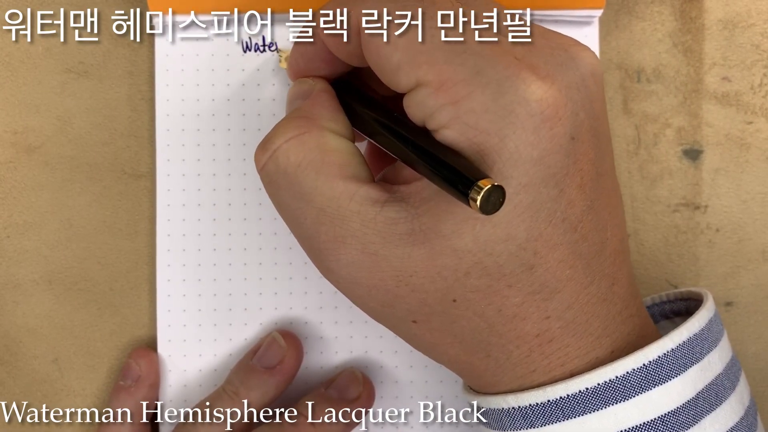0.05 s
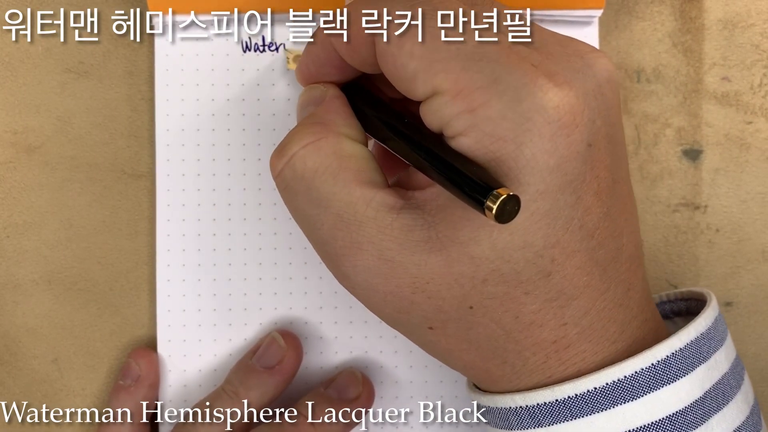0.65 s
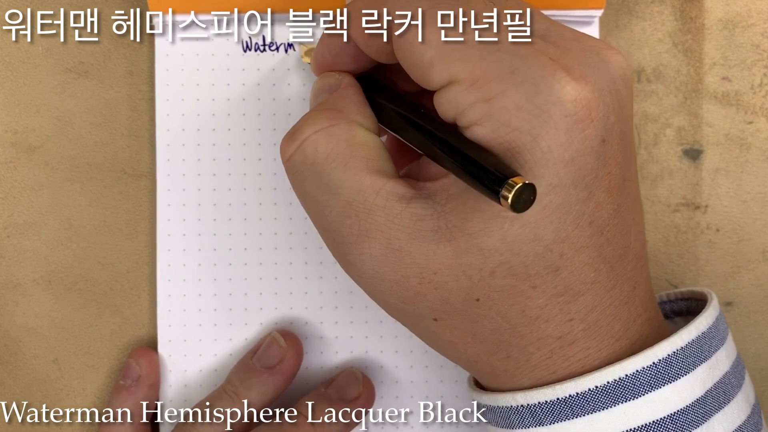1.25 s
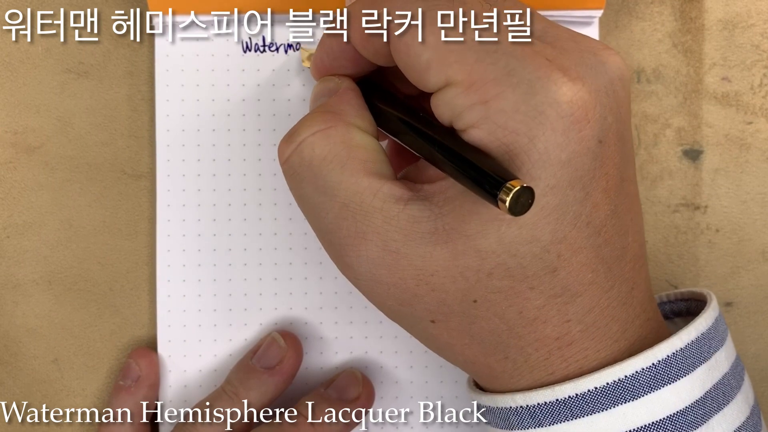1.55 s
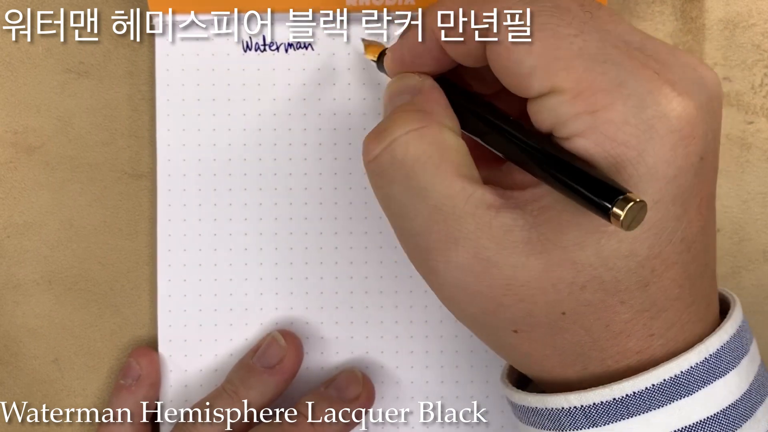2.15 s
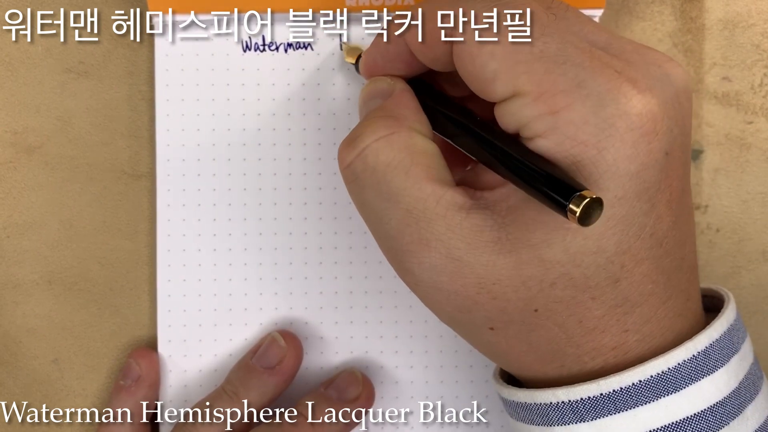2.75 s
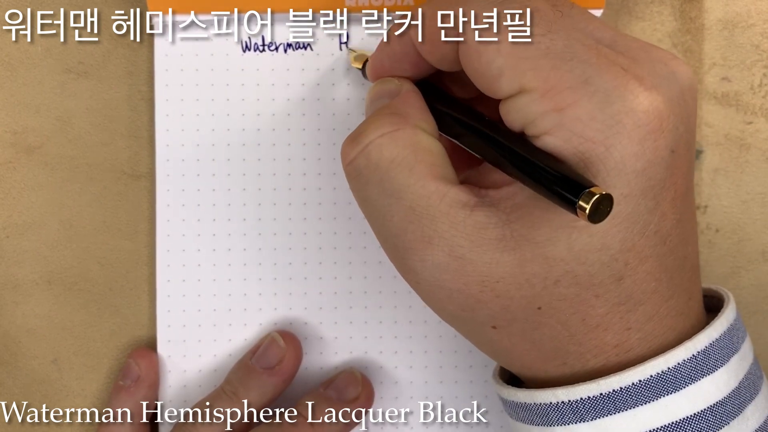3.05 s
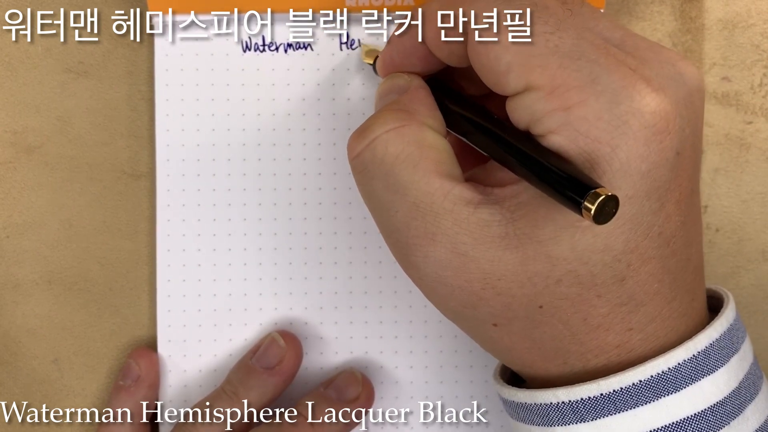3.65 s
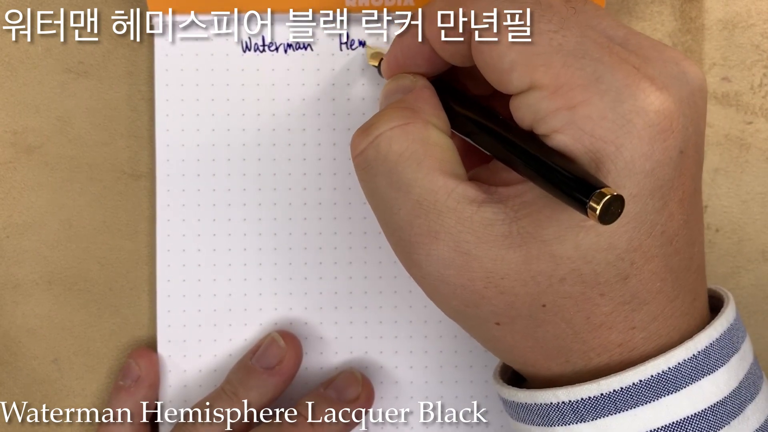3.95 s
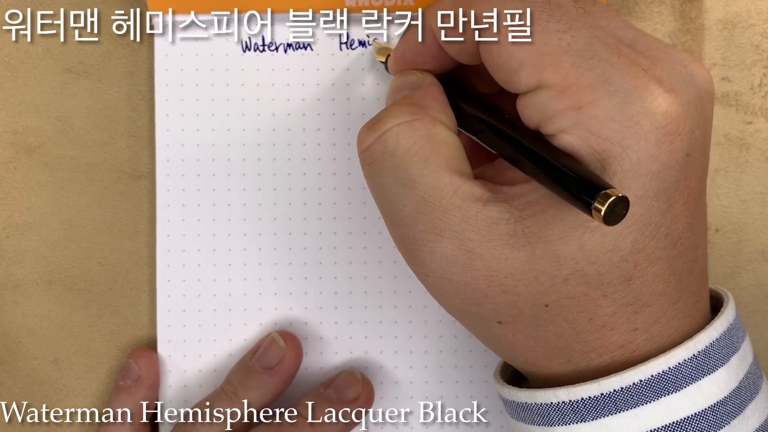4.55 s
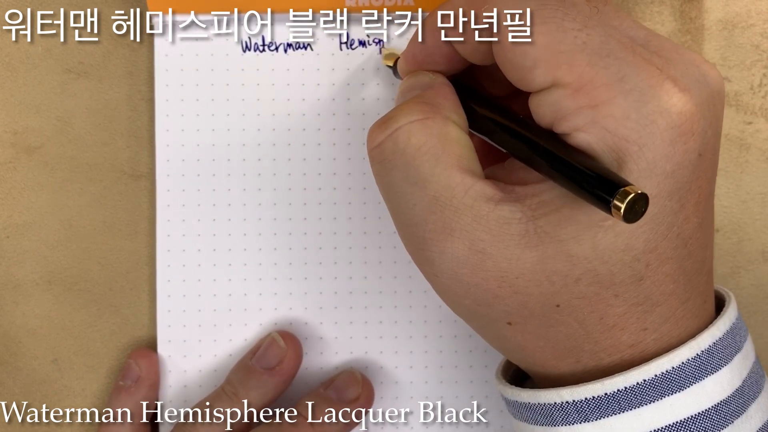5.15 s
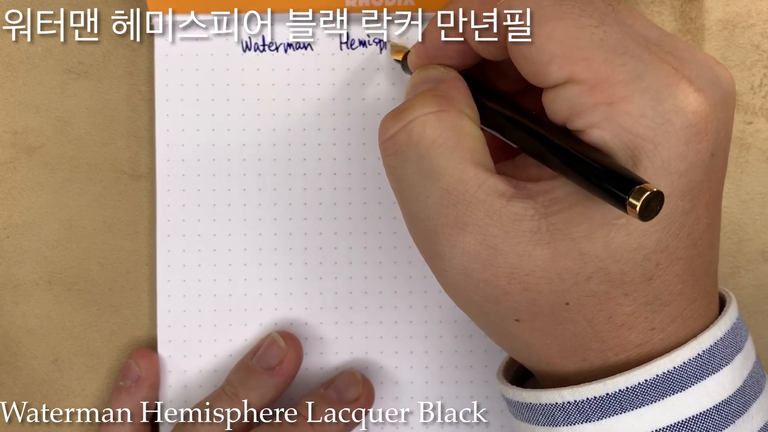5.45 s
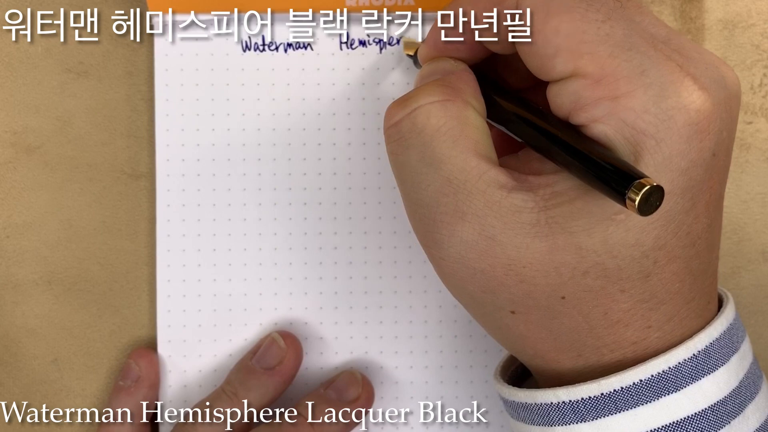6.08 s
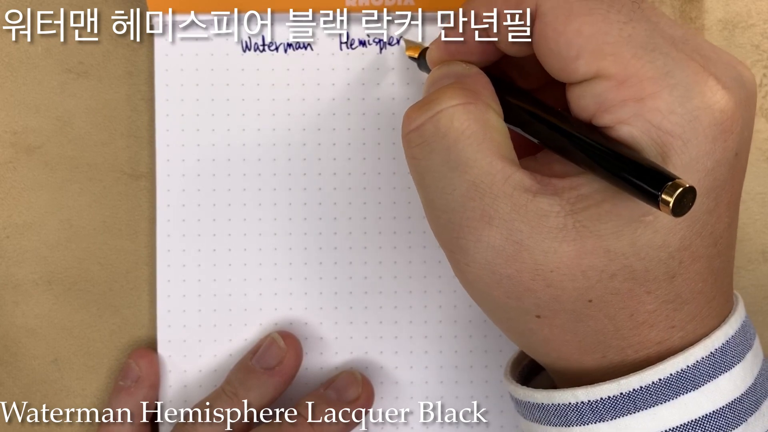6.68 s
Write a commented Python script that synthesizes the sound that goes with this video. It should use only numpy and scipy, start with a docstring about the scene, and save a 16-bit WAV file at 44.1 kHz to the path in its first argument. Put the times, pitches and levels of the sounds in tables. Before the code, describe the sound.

In a quiet room with a low, slowly throbbing hum, a hand brushes softly over paper and a fountain pen starts scratching out small letters. The close microphone picks up the nib's thin rasp, sharp little clicks and soft knocks through the pad into the desk. The hand shifts with a gritty swish between words, then a longer run of strokes follows, ending with a rough catch of the nib and a faint brush of skin.

```python
"""First you hear a quiet room's low hum, a hand brushing over paper and the scratch of a fountain pen.
Two motors and the mains make the hum. The pen writes small letters on a pad on a wooden desk:
its steel tip, the nib, rasps over the paper fibres and chatters when pushed against them.
The nib also clicks, taps down so that the desk thumps, and now and then snags.
Between the words the hand slides along the page, once breaking free with a gritty jerk."""
import sys
import numpy as np
from scipy import signal
from scipy.fft import rfft, irfft
from scipy.io import wavfile

SR = 44100
rng = np.random.default_rng(int(sys.argv[2]) if len(sys.argv) > 2 else 0)


def unload_audio(sound):
    """Save the sound as a 16-bit wav file, at the path given as the first command line argument."""
    columns = np.transpose(np.atleast_2d(sound))
    # keep every value between -1 and 1, then stretch to whole-number steps
    steps = np.round(np.clip(columns, -1, 1) * 32767)
    wavfile.write(sys.argv[1], SR, steps.astype(np.int16))


N = 300762
TIME = np.arange(N) / SR


def from_db(db):
    """Turn decibels into a number to multiply a sound by."""
    return 10 ** (np.asarray(db) / 20)


def rms_one(x):
    """Scale a signal so that its average strength (rms) is one."""
    return x / np.sqrt(np.mean(x ** 2) + 1e-20)


def drift(rate):
    """A smooth random wobble of strength one that changes about `rate` times a second."""
    hz = np.arange(N // 2 + 1) * SR / N
    return rms_one(irfft(rfft(rng.standard_normal(N)) / (1 + (hz / rate) ** 2), N))


def colour(x, spectrum):
    """Shape a sound's lows and highs along a curve of (f/Hz, level/dB); strength one."""
    points_hz, points_db = np.transpose(spectrum)
    hz = np.arange(1, N // 2 + 2) * SR / N
    curve_db = np.interp(np.log(hz), np.log(points_hz), points_db)
    return rms_one(irfft(rfft(x) * from_db(curve_db), N))


def resonate(x, modes):
    """Ring an object's natural tones (modes), added with alternating signs; narrow ones ring longer."""
    out = np.zeros(len(x))
    for k, (hz, width, db) in enumerate(modes):
        r = np.exp(-np.pi * width / SR)
        poles = [1, -2 * r * np.cos(2 * np.pi * hz / SR), r * r]
        out += (-1) ** k * from_db(db) * (1 - r * r) / 2 * signal.lfilter([1, 0, -1], poles, x + 1e-18)
    return out


def shifting_ring(fibres, modes, wander_db):
    """Each tone grows and fades as the turning pen presses differently on the paper; strength one."""
    return rms_one(sum((-1) ** k * resonate(fibres, [mode]) * from_db(wander_db * drift(2.8))
                       for k, mode in enumerate(modes)))


def strike(times, peak_db, modes, contact_hz):
    """Knocks on an object, each ringing up to its given peak; a soft contact lacks the highs."""
    soften = signal.butter(2, min(contact_hz, .45 * SR), fs=SR, output="sos")
    blows = np.zeros(N)
    blows[np.round(np.asarray(times) * SR).astype(int)] = from_db(peak_db)
    one_blow = signal.sosfilt(soften, resonate(signal.unit_impulse(SR // 10), modes))
    return signal.sosfilt(soften, resonate(blows, modes)) / np.abs(one_blow).max()


def grains(per_s, spread_db):
    """Tiny random hits of uneven size and sign; strength one."""
    sizes = from_db(spread_db * np.minimum(rng.exponential(1, N), 4)) * rng.choice([-1, 1], N)
    return rms_one(sizes * (rng.random(N) < per_s / SR))


def swells(middles, lengths, dbs, pointed=1.07):
    """Each movement speeds up and slows down: one arch of loudness, flatter on top when less pointed."""
    out = np.zeros(N)
    for middle, length, db in zip(middles, lengths, dbs):
        inside = np.abs(TIME - middle) < length / 2
        out[inside] += from_db(db) * np.cos(np.pi * (TIME[inside] - middle) / length) ** pointed
    return out


# the lows and highs of the room's background noise: f/Hz, level/dB
ROOM_SPECTRUM = [(8, -14), (22, -4.5), (32, 5), (48, 2.5), (85, -4), (150, -8), (235, -9.5), (290, -13.5),
                 (480, -20.5), (1000, -25), (2500, -28.5), (4500, -31.5), (9000, -32.5), (15500, -38.5)]


def room_hum():
    """Two motors of nearly equal speed throb slowly, over a mains tone and steady rumble and hiss."""
    motor_hz, mains_hz, throb_hz = 59.05, 120, 0.403
    since_in_step = TIME - 2.79   # the two motors line up at 2.79 s
    turns = motor_hz * TIME + .035 * drift(8.2)
    first = from_db(-49) * np.sin(2 * np.pi * turns)
    second_db = -54 + since_in_step   # grows 1 dB a second, so the throb deepens
    second = from_db(second_db) * np.sin(2 * np.pi * (turns + throb_hz * since_in_step))
    mains = from_db(-59 + drift(2.5)) * np.sin(2 * np.pi * mains_hz * TIME + 0.42 * drift(1.2))
    air = from_db(-52) * colour(rng.standard_normal(N), ROOM_SPECTRUM)
    return np.sqrt(2) * (first + second + mains) + air


# the hand's moves along the page: middle t/s, length/s, level/dB
HAND_SLIDES = [(0.035, 0.21, -62), (0.205, 0.2, -60), (1.992, 0.19, -53.5), (2.141, 0.13, -59),
               (4.39, .08, -63.5), (6.29, 0.15, -67), (6.48, 0.12, -62.5)]
# the lows and highs of skin rubbing on paper: f/Hz, level/dB
SKIN_SPECTRUM = [(200, -5), (500, -3), (1000, -0.5), (2000, 0), (3500, -3.5), (5500, -5.5), (6500, -3.5),
                 (9000, -8.5), (10600, -4), (13000, -12.5), (16000, -7.5)]


def hand_slides():
    """Skin drags over paper and makes a grainy swish with each move."""
    swish = colour(grains(per_s=10000, spread_db=2.5), SKIN_SPECTRUM)
    flicker = from_db(1.6 * drift(70))
    return swells(*np.transpose(HAND_SLIDES), pointed=1.16) * swish * flicker


# the tones of the steel nib, also rung by its clicks: f/Hz, width/Hz, level/dB
NIB_TONES = [(4720, 72, -0.5), (5400, 340, -8.5), (6050, 160, -1.5), (6714, 320, -3.5), (6900, 160, 2.5),
             (7710, 210, 2), (9120, 220, -2.5), (10540, 430, -7), (11540, 300, -5), (11800, 690, -5),
             (11850, 280, 2.5), (13400, 400, -4.5), (15160, 350, 0), (15540, 400, -0.5)]
# the tones of the chattering pen: f/Hz, width/Hz, level/dB
CHATTER_TONES = [(835, 340, -7.5), (1480, 210, 3.5), (2300, 570, -9), (3160, 390, -7), (4120, 570, -5),
                 (6870, 280, -8)]
# the bright hiss of sliding steel: f/Hz, level/dB
HISS_SPECTRUM = [(1500, -11), (4000, -2.5), (7000, 0), (12000, 3.5), (16000, -10)]
# the duller rasp of the sheet: f/Hz, level/dB
PAPER_SPECTRUM = [(250, 6), (500, -4), (750, 5.5), (1100, -2.5), (1900, -1.5), (3000, -6.5), (5500, -15.5),
                  (10000, -19), (16000, -24)]
# pen strokes: middle t/s, length/s, level/dB, push (0 = pulled along, 1 = driven against the fibres)
PEN_STROKES = [(.016, 0.031, -58, 0.76), (0.312, .024, -66, 0.9), (0.625, 0.087, -62, 0.4),
               (0.727, 0.065, -60.5, 1), (.824, 0.066, -63.5, 0.2), (0.942, .052, -62.5, 0.82),
               (1.037, 0.08, -64, .05), (1.33, 0.062, -64.5, .05), (1.416, 0.045, -61, 0.8),
               (1.61, 0.074, -66.5, .7), (1.694, 0.075, -64, 0.4), (1.785, 0.051, -60.5, .8),
               (1.883, 0.13, -64, 0.5), (2.592, 0.082, -57.5, 0.38), (2.79, .086, -67.5, 0.64),
               (2.85, .075, -58, 0.04), (2.955, .1, -58.5, 0.4), (3.212, 0.088, -62, 0.76),
               (3.296, 0.068, -62, 0.25), (3.356, 0.1, -63.5, 0.63), (3.542, .076, -62, 0),
               (3.639, .058, -60, .88), (3.725, 0.057, -61.5, 0.2), (3.823, .057, -60.5, 0.86),
               (3.916, .075, -65, 0), (4.163, 0.054, -72, 0), (4.338, 0.11, -65.5, 0.5),
               (4.484, .06, -69, .05), (4.618, .087, -71, .2), (4.714, .075, -67.5, .5),
               (4.834, 0.096, -60.5, 0.3), (4.954, 0.12, -65, 0.86), (5.053, 0.16, -65, 0.2),
               (5.298, 0.088, -59, 0.2), (5.563, 0.089, -61.5, 0.7), (5.654, 0.075, -63.5, .05),
               (5.748, .08, -66, .4), (5.892, .08, -67, 0.6), (5.989, 0.067, -62, 0.8)]


def pen_strokes():
    """Fibres flick the nib: steel hisses and rings, the sheet rasps, and pushing makes the pen chatter."""
    middle, length, db, push = np.transpose(PEN_STROKES)
    grip = from_db(1.8 * drift(79))   # the paper is rougher in some spots than in others
    ring = shifting_ring(grip * grains(per_s=8700, spread_db=-0.5), NIB_TONES, wander_db=1.9)
    hiss = colour(grip * grains(per_s=11000, spread_db=0.5), HISS_SPECTRUM)
    steel = from_db(-2) * ring + from_db(-5.5) * hiss
    sheet = from_db(2) * colour(grip * grains(per_s=5000, spread_db=1.5), PAPER_SPECTRUM)
    chatter = from_db(-1.5) * shifting_ring(grains(per_s=2800, spread_db=0), CHATTER_TONES, wander_db=1)
    # only the hardest pushes lock into a wavering squeak on the strongest chatter tone
    squeak_hz = CHATTER_TONES[1][0] * (1.01 + 0.042 * drift(126))
    squeak = grip * np.sqrt(2) * np.sin(2 * np.pi * np.cumsum(squeak_hz) / SR)
    # each part's level: the stroke's dB, its own offset, and what pushing adds or takes away
    return (swells(middle, length, db + 1 - 3.5 * push, pointed=.85) * steel
            + swells(middle, length, db - 0.6 + 1.5 * push, pointed=.92) * sheet
            + swells(middle, length, db - 11.5 + 19 * push, pointed=1) * chatter
            + swells(middle, length, db - 17.5 + 21 * push ** 3, pointed=1) * squeak)


# the tones of the pen's body, also shaken by snags: f/Hz, width/Hz, level/dB
PEN_BODY_TONES = [(370, 54, 14), (724, 390, 6), (1020, 550, 4), (1610, 580, 1), (2294, 160, 2.5),
                  (2770, 150, 2), (4030, 240, -1.5), (4450, 120, -0.5), (7400, 120, -6)]
# light, sharp clicks of the nib: t/s, level/dB
NIB_CLICKS = [(0.5536, -44.5), (0.574, -45), (1.944, -41), (2.5047, -43), (3.107, -43.5), (3.471, -44),
              (4.0808, -42), (4.2624, -42.5), (4.6896, -43), (5.2075, -41.5), (5.461, -44), (5.543, -39.5)]


def nib_clicks():
    """The nib's two prongs snap together: a crack through the pen with a brief steel ring."""
    times, db = np.transpose(NIB_CLICKS)
    crack = strike(times, db - 4.5, PEN_BODY_TONES[3:], contact_hz=5000)
    ring = strike(times + 0.0005, db - 5.5, NIB_TONES, contact_hz=11000)
    return crack + ring


# the tones of the paper pad: f/Hz, width/Hz, level/dB
PAD_TONES = [(500, 140, 8), (885, 540, 8.5), (1840, 1300, -38), (4000, 3000, -10.5)]
# the deep tones of the wooden desk: f/Hz, width/Hz, level/dB
DESK_TONES = [(114.5, 17.7, 6.5), (189, 29, -2.5), (224.5, 17.2, 2), (406, 120, -13.5)]
# the nib's landings on the pad: t/s, tick level/dB, thump level/dB
NIB_TAPS = [(0.573, -45, -57), (1.686, -39.5, -43.5), (1.777, -56, -45.5), (1.874, -50, -44.5),
            (3.205, -53, -58), (3.351, -43, -44.5), (3.715, -42.5, -45), (3.734, -41.5, -46.5),
            (3.921, -43, -51), (3.974, -49, -52), (4.209, -43, -49), (4.333, -44, -51), (4.349, -44, -46),
            (4.566, -46, -49), (4.587, -41, -47), (4.689, -46, -48), (5.543, -37, -42.5), (5.69, -51, -54),
            (5.709, -41, -48.5), (5.986, -46, -43.5), (6.262, -46.5, -54)]


def nib_taps():
    """The nib lands with a dull tick on the pad, and the desk beneath thumps a moment later."""
    times, tick_db, thump_db = np.transpose(NIB_TAPS)
    tick = strike(times, tick_db + 0.5, PAD_TONES, contact_hz=4500)
    thump = strike(times + 0.0022, thump_db + 5, DESK_TONES, contact_hz=600)
    return tick + thump


# moments when the nib catches on the paper: middle t/s, length/s, level/dB
NIB_SNAGS = [(1.797, 0.039, -57.5), (1.946, 0.0095, -51), (4.948, 0.032, -57), (5.31, 0.03, -59),
             (5.549, 0.032, -54), (5.742, 0.088, -63), (5.995, 0.044, -47.5)]


def nib_snags():
    """The caught nib slips in quick, rough jerks that shake the whole pen."""
    jerk_hz = 170 * from_db(2.8 * drift(60))
    cycle = np.cumsum(jerk_hz) / SR % 1
    slips = grains(per_s=3000, spread_db=2) * np.exp(-2.1 * cycle)   # lets go at once, then grips again
    return swells(*np.transpose(NIB_SNAGS)) * rms_one(resonate(slips, PEN_BODY_TONES))


# the lows and highs of the hand's gritty jerk: f/Hz, level/dB
JERK_SPECTRUM = [(260, -38), (450, -8), (553, -1), (1070, -4), (1550, -7.5), (3390, -10.5), (12000, -18.5),
                 (15600, -48), (22000, -120)]


def hand_jerk():
    """The hand breaks free of the sheet with a sudden rasp that quickly dies away."""
    start_s, fade_s = 1.991, 0.033
    fade = (TIME >= start_s) * np.exp(-np.abs(TIME - start_s) / fade_s)
    return from_db(-46.5) * fade * colour(grains(per_s=3000, spread_db=4), JERK_SPECTRUM)


def scene():
    """Room, hand and pen add up in one channel, heard from close by."""
    mix = room_hum() + hand_slides() + pen_strokes() + nib_clicks() + nib_taps() + nib_snags()
    return (mix + hand_jerk())[None]


def record(dry):
    """A steep filter removes the very highest treble."""
    cutoff_hz = 15700
    return signal.sosfilt(signal.ellip(12, .1, 70, cutoff_hz, fs=SR, output="sos"), dry)


dry = scene()
out = record(dry)
unload_audio(out)
```